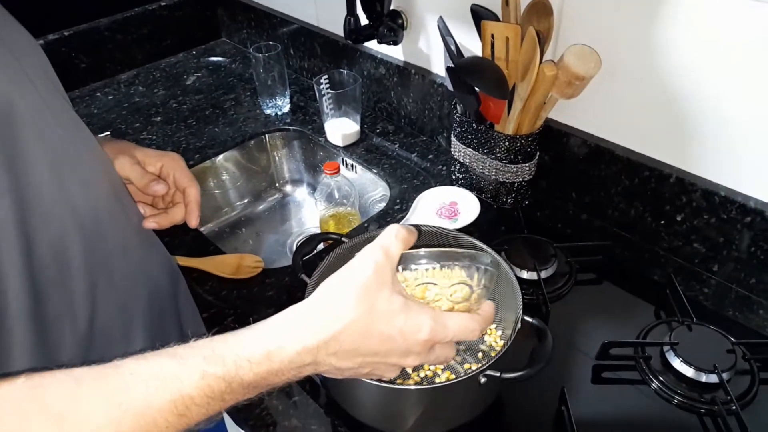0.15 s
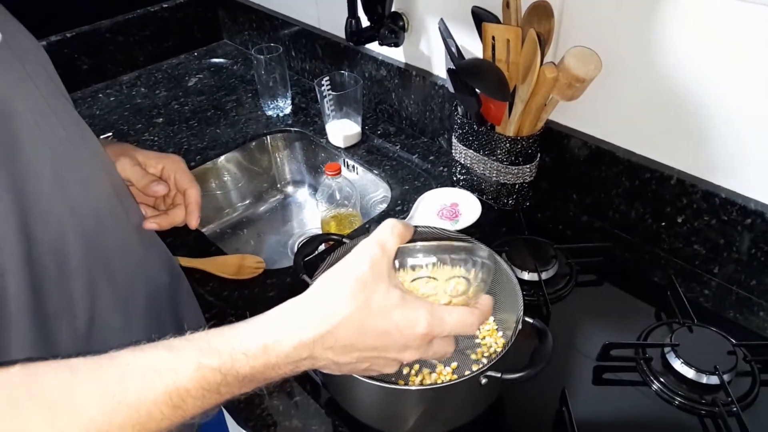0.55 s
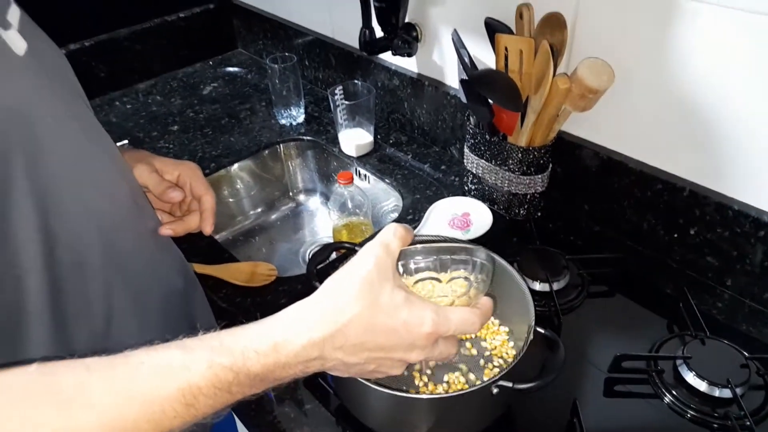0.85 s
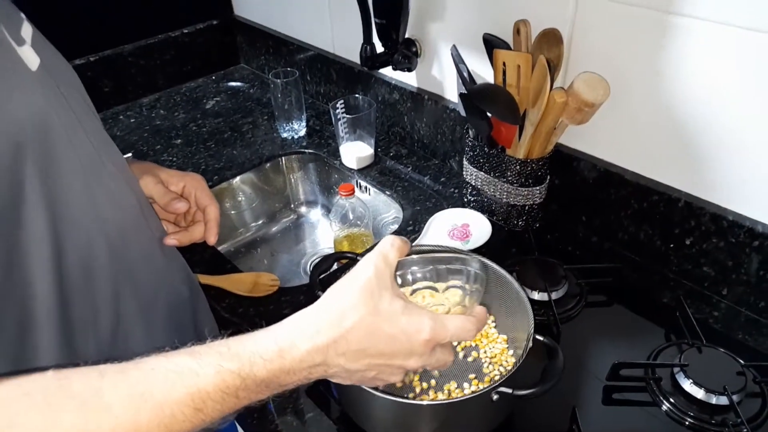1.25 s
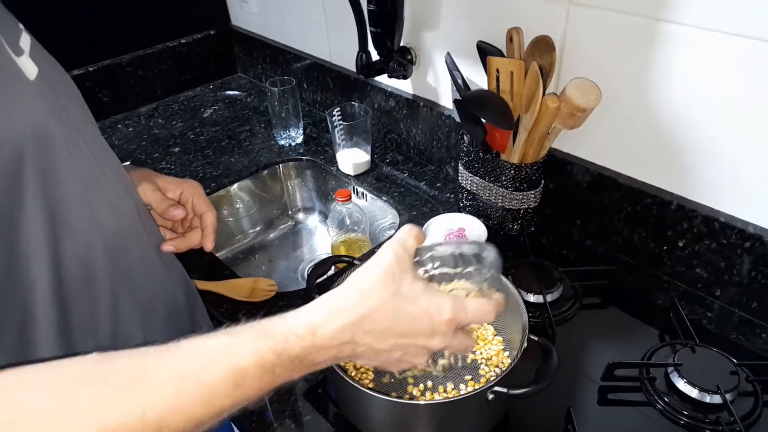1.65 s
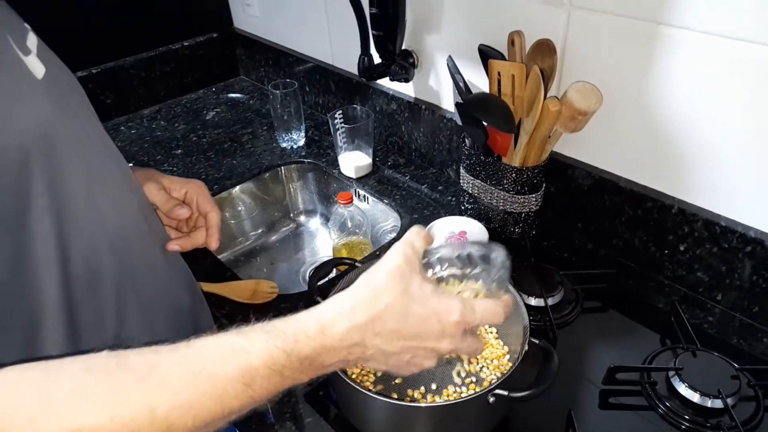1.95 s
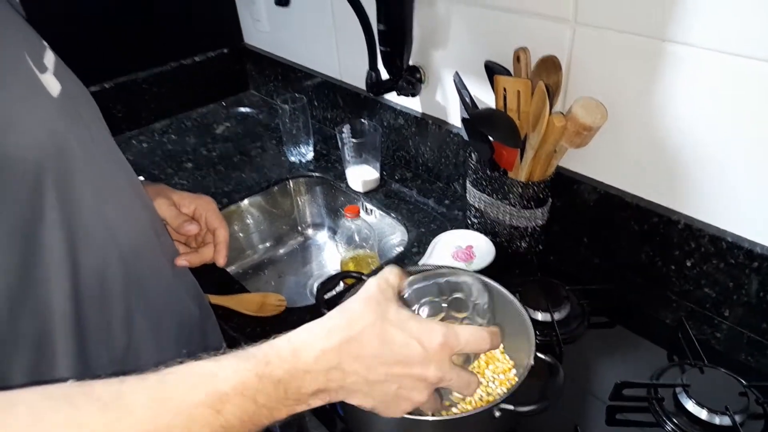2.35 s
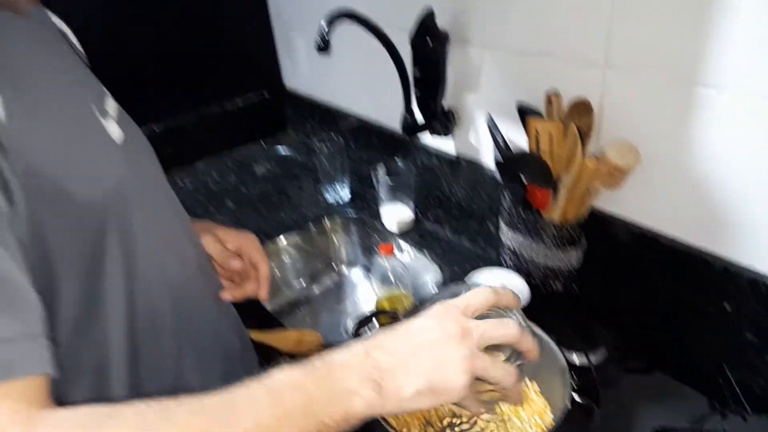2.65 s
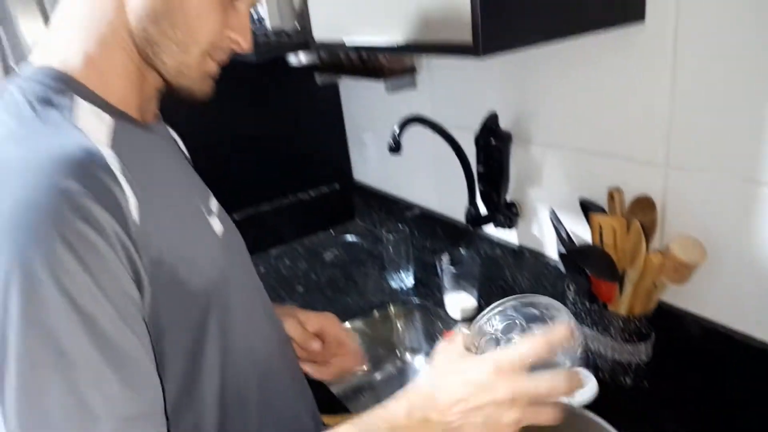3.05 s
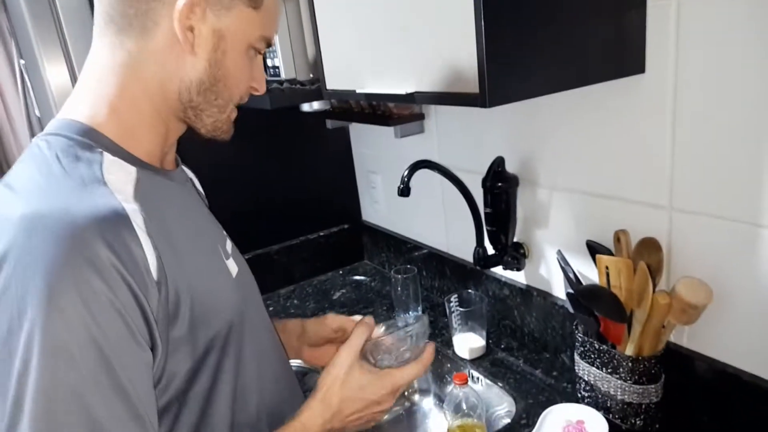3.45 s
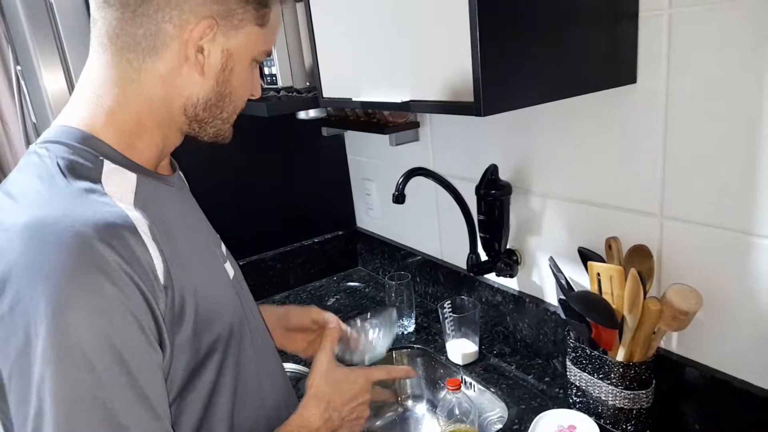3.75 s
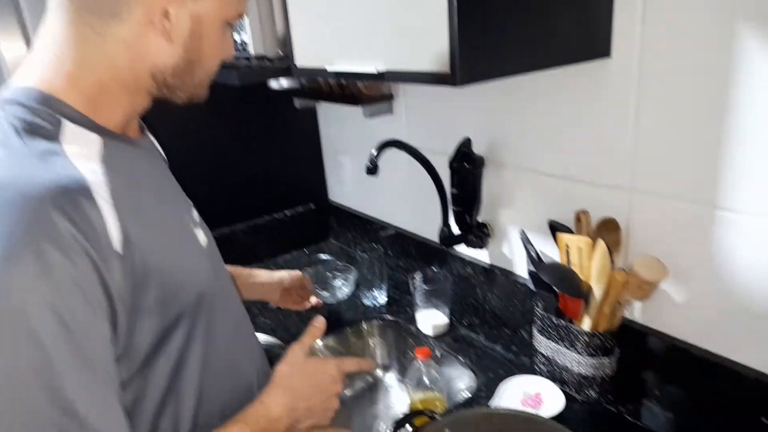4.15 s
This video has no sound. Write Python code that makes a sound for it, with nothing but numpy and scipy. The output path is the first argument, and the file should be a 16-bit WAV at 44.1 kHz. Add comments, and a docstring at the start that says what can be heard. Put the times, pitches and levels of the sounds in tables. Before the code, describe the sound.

Close to the microphone in a tiled kitchen, hard corn kernels clatter into a metal pot on the stove, coming in clumps over a thin trickle. Sharp ticks and pings mix with the ring of the pot and a low rumble, and the growing heap rattles more dully. After the last kernels settle, only a faint hiss and a few light knocks and clinks of hands on the glass bowl remain.

```python
"""A tiled kitchen, a phone's stereo microphone close to a metal pot on the stove.
Dry popcorn kernels are shaken in from a glass bowl, in spurts and clumps over a thin trickle.
They tick on the metal, ring the pot and thump the stove; the growing heap adds a duller rattle.
When the last ones settle, hands knock lightly on the empty bowl over a soft background hiss."""
import sys
import numpy as np
from scipy import signal
from scipy.fft import rfft, irfft
from scipy.io import wavfile
from scipy.ndimage import uniform_filter1d

SR = 44100
rng = np.random.default_rng(int(sys.argv[2]) if len(sys.argv) > 2 else 0)


def transcribe(signal):
    """Save signal, clipped to [-1, 1], as a 16-bit WAV file at the path in sys.argv[1]."""
    frames = np.atleast_2d(signal).T
    limited = np.clip(frames, -1, 1)
    pcm = np.round(limited * 32767).astype(np.int16)
    wavfile.write(sys.argv[1], SR, pcm)


N = 190280
TIME = np.arange(N) / SR


def undb(db):
    """Decibels to gain."""
    return 10 ** (np.asarray(db) / 20)


def unit(x):
    """Scale to unit energy in each channel."""
    return x / np.sqrt(np.sum(x ** 2, axis=-1, keepdims=True))


def curves(table):
    """Each column of a table, joined by straight lines in time."""
    times, *columns = np.transpose(table)
    return [np.interp(TIME, times, column) for column in columns]


def at_hz(points, hz):
    """Read (Hz, value) points on a log-frequency axis."""
    freqs, values = np.transpose(points)
    return np.interp(np.log(hz + 1), np.log(freqs), values)


def convolve(x, response):
    """Convolve, keeping the length."""
    return signal.oaconvolve(np.atleast_2d(x), np.atleast_2d(response), axes=-1)[:, :x.shape[-1]]


def tint(x, spectrum, size=4096):
    """Minimum-phase filter with the given spectrum and unit power gain."""
    gain = undb(at_hz(spectrum, np.fft.rfftfreq(size, 1 / SR)))
    cepstrum = irfft(np.log(gain))
    cepstrum[1:size // 2] *= 2
    cepstrum[size // 2 + 1:] = 0
    response = irfft(np.exp(rfft(cepstrum)))
    return convolve(x, unit(response))


def mode(x, hz, t60, drift=0, lead=0):
    """One ringing mode with unit power gain; its phase may drift, and lead by a set angle."""
    pole = np.exp((2j * np.pi * hz - np.log(1000) / t60) / SR)
    gain = np.sqrt(2 * (1 - abs(pole) ** 2))
    turn = np.exp(1j * drift)
    ring = signal.lfilter([gain], [1, -pole], x / turn) * turn
    return (ring * np.exp(1j * lead)).imag


def pan(x, db):
    """Lean to the microphone's left by db."""
    return x * undb(np.array([[db], [-db]]) / 2)


def walk(rate):
    """Smooth random motion with a spread near 1 and `rate` turns a second."""
    hold = int(SR / rate)
    steps = np.repeat(rng.standard_normal(N // hold + 1), hold)
    return 1.31 * uniform_filter1d(uniform_filter1d(steps, hold), hold)[:N]


def stream(rate, scatter_db):
    """Random impacts of uneven size, `rate` a second, with a fairly steady power."""
    sizes = undb(scatter_db * np.clip(rng.standard_normal(N), -3, 1.8))
    hits = sizes * (rng.random(N) < rate / SR)
    power = uniform_filter1d(hits ** 2, int(0.024 * SR))
    return hits / np.sqrt(np.abs(power) + 0.15 * power.mean())


def cracks(hits, t60, rise_s=0.00048):
    """Every impact sets off its own brief crack of noise, different in each channel."""
    fall, rise = np.exp(-np.log(1e6) / t60 / SR), np.exp(-1 / rise_s / SR)
    power = signal.lfilter([(1 - fall) * (1 - rise)], np.poly([fall, rise]), hits ** 2 + 1e-18)
    return np.sqrt(np.abs(power)) * rng.standard_normal((2, N))


# reverberation of the tiled room: (frequency [Hz], t60 [s])
KITCHEN_T60 = [(100, 1), (600, 0.42), (3000, 0.67), (7000, 0.24), (14000, 0.17)]
def kitchen(x, early_db, tail_db, early_t60=0.17, shared_hz=450, size=32768):
    """Direct sound, quick echoes off pot wall, counter and tiles, then a tail whose treble dies first."""
    hz, age, noise = signal.stft(rng.standard_normal((3, size)), SR, nperseg=256)
    shared = 1 / (1 + (hz[:, None] / shared_hz) ** 4)  # both channels get the same bass
    field = np.sqrt(shared) * noise[:1] + np.sqrt(1 - shared) * noise[1:]
    early = signal.istft(field * undb(-60 * age / early_t60))[1]
    decay = undb(-60 * age / at_hz(KITCHEN_T60, hz)[:, None])
    onset = 1 - np.exp(-age / 0.00049)
    tail = signal.istft(field * decay * onset)[1]
    return x + convolve(x, undb(early_db) * unit(early) + undb(tail_db) * unit(tail))


# kernels that keep sliding out between the shakes: (time [s], level [dB])
TRICKLE = [(0, -17.5), (.8, -25), (1.1, -18.5), (1.22, -30.5), (1.38, -24), (1.5, -24), (1.57, -29),
           (1.62, -28.5), (1.68, -26), (1.8, -24), (2.2, -23), (2.78, -24.5)]
def trickle(settle_db_per_s, pour_end_s=2.782):
    """Gain of the thin stream under the spurts, which dies when the bowl is empty."""
    return undb(curves(TRICKLE)[0] - settle_db_per_s * np.maximum(TIME - pour_end_s, 0))


def spurt(start, length, swell_db, attack_s=0.0036, release_db_per_s=210):
    """Gain of one spurt: a quick attack, a hold that swells or sags, then a steady release."""
    age = np.maximum(TIME - start, 0)
    hold_db = swell_db * (np.minimum(age / length, 1) - .5)
    release_db = release_db_per_s * np.maximum(age - length, 0)
    return (1 - np.exp(-age / attack_s)) * undb(hold_db - release_db)


def clumps(rows, spread_s=0.008, taper_db=28, count=8):
    """A clump is a handful of kernels landing within milliseconds, hardest near its middle."""
    hits = np.zeros(N)
    for (start, db), chance in zip(rows, rng.random((len(rows), count))):
        lateness = (np.arange(count) + chance - chance[0]) / count
        landings = ((start + spread_s * lateness) * SR).astype(int)
        hits[landings] += undb(db) * unit(undb(-taper_db * np.abs(lateness - .35)))
    return hits


# one spurt for each shake of the bowl: (time [s], length [s], level [dB], swell over its length [dB],
# leading clump [dB], heap rattle relative to the spurt [dB], stove thump [dB])
SPURTS = [(0.017, 0.077, -20.5, 1.5, -27.5, -15, -39), (0.183, 0.075, -20.5, 2, -17, -13, -37),
          (0.271, 0.045, -19.5, -11, -15.5, -13.5, -39.5), (0.452, 0.08, -22, 0, -17, -13.5, -40.5),
          (0.515, 0.043, -19.5, 4, -15.5, -11.5, -38), (0.637, 0.14, -20, -4, -20.5, -14.5, -41),
          (0.743, 0.068, -20, -5, -20, -14.5, -44), (0.868, 0.12, -19.5, 2.5, -18, -11, -38.5),
          (1.007, 0.099, -19.5, -5.5, -24, -14.5, -47), (1.16, 0.012, -23, 2, -19, -10.5, -41),
          (1.221, 0.16, -21, -2, -15, -17.5, -44), (1.454, 0.059, -19, 3, -15.5, -14.5, -40),
          (1.63, 0.085, -19, 6.5, -15.5, -14.5, -40), (1.826, 0.1, -22.5, 4, -21, -15.5, -45),
          (1.983, 0.17, -19.5, 3, -27, -15.5, -40.5), (2.247, 0.11, -18.5, -2, -29, -11.5, -45),
          (2.418, 0.12, -17.5, -5.5, -17.5, -9, -44.5), (2.544, 0.19, -18, -2, -19.5, -8.5, -47)]
# clumps that drop during a spurt or after it: (time [s], level [dB])
CLUMPS = [(0.031, -18.5), (0.05, -25), (0.084, -18.5), (0.1, -19), (0.193, -17.5), (0.209, -19.5),
          (0.238, -24), (0.299, -22.5), (0.327, -18), (0.362, -16.5), (0.416, -22), (0.467, -19.5),
          (0.544, -22), (0.614, -20), (0.66, -24), (0.682, -15), (0.791, -23.5), (0.833, -22.5),
          (0.881, -18), (0.908, -23), (0.932, -21), (0.943, -22), (0.956, -20), (1.018, -26), (1.037, -28),
          (1.05, -17), (1.07, -19.5), (1.085, -19), (1.11, -17), (1.166, -21.5), (1.179, -17.5),
          (1.254, -25), (1.277, -16.5), (1.326, -18.5), (1.361, -17.5), (1.395, -21), (1.426, -22),
          (1.474, -18.5), (1.498, -21), (1.514, -16.5), (1.61, -23), (1.66, -22), (1.686, -26),
          (1.705, -28), (1.814, -24), (1.846, -23), (1.871, -23), (1.886, -26), (1.906, -18.5),
          (1.972, -25), (1.988, -24.5), (2.004, -29), (2.033, -20), (2.055, -17.5), (2.074, -16.5),
          (2.107, -19), (2.149, -21), (2.182, -20), (2.231, -21), (2.264, -17), (2.333, -21),
          (2.468, -18.5), (2.573, -26), (2.631, -21)]
def kernels():
    """The pour, close up: stream and clumps tick on the metal, ring the pot and rattle on the heap."""
    starts, lengths, _, _, leading_db, on_heap_db, _ = np.transpose(SPURTS)
    thrown = [undb(db) * spurt(start, length, swell_db) for start, length, db, swell_db, *_ in SPURTS]
    flow = np.max(thrown + [trickle(settle_db_per_s=125)], axis=0)
    hits = undb(-4.5) * stream(rate=680, scatter_db=3.5) * flow
    hits += undb(21.5) * clumps(list(zip(starts, leading_db)) + CLUMPS)
    heap_db = np.interp(TIME, starts + lengths / 2, on_heap_db)
    bare = undb(-.7 * (heap_db - heap_db.min()))  # cushioned by the heap, kernels ring the pot less
    rings = pot(hits * bare)
    rattle = heap(hits * undb(heap_db))
    return ticks(hits) + undb(-28.5) * pan(rings, db=2) + undb(-8.5) * pan(rattle, db=3)


# spectra of a kernel's tick, its ping and the snap of a hard landing: (frequency [Hz], level [dB])
TICK_SPECTRUM = [(200, -44), (500, -32), (1450, -19), (2300, -13.5), (3600, -13), (4700, -8.5),
                 (5900, -9.5), (7000, -3.5), (9000, -9), (12000, -1), (16000, -7)]
PING_SPECTRUM = [(5500, -34.5), (6350, -13.5), (6750, -4.5), (7180, -2.5), (7650, -22), (8800, -20.5)]
SNAP_SPECTRUM = [(7500, -25), (9500, -10), (11000, -6), (12500, 2.5), (16000, 3.5)]
def ticks(hits, spots=4):
    """Hard shells on steel: a dry tick, a ping and, for hard landings, a bright snap."""
    power = np.abs(uniform_filter1d(hits ** 2, int(0.063 * SR)))
    hardness = (power / power.mean()) ** .25  # harder contacts are shorter, so the top octave grows most
    landing_spot = rng.integers(spots, size=N)
    out = 0
    for spot in range(spots):  # each spot in the pot reaches the microphone by its own paths
        here = hits * (landing_spot == spot)
        tick = tint(cracks(here, t60=0.004, rise_s=0.0005), TICK_SPECTRUM)
        ping = tint(cracks(here, t60=0.0099), PING_SPECTRUM)
        snap = tint(cracks(here * hardness, t60=0.0049, rise_s=0.00034), SNAP_SPECTRUM)
        direct = undb(-5.7) * pan(tick, db=-2.2) + undb(-14) * ping + undb(-5) * pan(snap, db=-2)
        out += kitchen(direct, early_db=-0.5, tail_db=-2, early_t60=0.12)
    return out


def wander(hz, pitch_share=0.00605):
    """Phase [rad] that a mode gains as sliding kernels detune it."""
    return 2 * np.pi * np.cumsum(hz * pitch_share * walk(rate=6.98)) / SR


# modes of the pot: (frequency [Hz], level [dB], t60 [s], gain once kernels cover the base [dB],
# phase lead of the left channel [rad])
POT_MODES = [(346.5, 0, 0.4, 2.5, 0.5), (377, 3, 0.065, -19, 0), (435, 5, 0.23, -11, -0.8),
             (503.7, 1.5, 0.08, -1.5, 0.5), (569, -3.5, 0.051, 4, -1.7), (603, -1.5, 0.13, -1.5, 2.4),
             (642, 1, 0.052, 0, -2.2), (697, 1, 0.15, 5, 3.3), (843, 0, 0.075, 0, -0.8),
             (913, 2, 0.12, -1.5, -1.2), (1003, -4.5, 0.057, -3, -0.8), (1150, 0.5, 0.12, 2, -1.1),
             (1215, 5.5, 0.12, -4.5, 0.37), (1272, 1, 0.22, -1.5, 0.8), (1504, 5.5, 0.063, -12, 2),
             (1775, -6.5, 0.13, 12, 1.5), (1896, 2, 0.081, -14, 1), (2178, 5.5, 0.35, -10, -0.6),
             (2406, 1.5, 0.052, -1, -1.5), (2660, 7, 0.066, -2, 2.5), (2954, 3.5, 0.088, -4, -0.5),
             (3270, 7.5, 0.19, -4, 2.46), (4264, 6.5, 0.083, 3, -3.5), (4480, 7.5, 0.18, -4, 1.5),
             (4694, 12, 0.038, -13, -2), (5000, 7.5, 0.009, -7, -1), (5383, 5, 0.077, -13, 0.5),
             (6650, 4, 0.069, -21, -3), (6804, -4, 0.12, -9, 2), (7190, -4, 0.06, -7, -0.3),
             (7560, -21, 0.097, -10, -1.5)]
def pot(hits):
    """Impacts drive each mode in or out of step, by where they land; the load shifts the balance, and each
    pitch wanders."""
    covered = 1 - np.exp(-(TIME / 1.95) ** 2)
    rings = 0
    for hz, db, t60, covered_db, lead in POT_MODES:
        drive = hits * rng.choice([-1, 1], N) * undb(db + covered_db * covered)
        rings += mode(drive, hz, t60, drift=wander(hz), lead=np.array([[lead], [0]]))
    return kitchen(rings, early_db=-7, tail_db=-13.5, early_t60=0.062, shared_hz=470)


# spectrum of the heap in the pot: (frequency [Hz], level [dB])
HEAP_SPECTRUM = [(150, -18), (240, -30), (300, -9.5), (410, -15), (520, -1.5), (590, 1), (680, 0),
                 (790, -2), (900, -4.5), (1170, 2), (1420, -9.5), (1690, -13), (1778, -6.5), (1870, -8.5),
                 (2200, -11.5), (4000, -18)]
def heap(hits):
    """Kernels landing on other kernels give a short, dull rattle."""
    rattle = tint(cracks(hits, t60=0.0038)[:1], HEAP_SPECTRUM)
    return kitchen(rattle, early_db=1.5, tail_db=0.5, early_t60=0.022, shared_hz=670)


# spectrum of the stove top: (frequency [Hz], level [dB])
STOVE_SPECTRUM = [(15, -34), (35, -22), (60, -5), (100, -7), (125, -7.5), (170, -31), (300, -22.5),
                  (800, -31.5)]
def stove():
    """Blows pass through the pot; the stove top, a little to the right, rumbles most as a spurt begins."""
    thumps = [undb(db) * spurt(start, length, swell_db=-3) for start, length, *_, db in SPURTS]
    force = np.max(thumps + [undb(-24.5) * trickle(settle_db_per_s=45)], axis=0)
    blows = stream(rate=320, scatter_db=5.5) * rng.choice([-1, 1], N) * force
    rumble = tint(blows + 1.05 * cracks(blows, t60=0.12), STOVE_SPECTRUM)
    return undb(-5.5) * pan(rumble, db=-4)


# single kernels on bare metal: (time [s], level [dB], pitch that the spot favours [Hz])
STRIKES = [(0.035, -27, 7560), (0.085, -38, 1215), (0.105, -37, 2178), (0.184, -29, 642), (0.2, -20, 6650),
           (0.265, -38, 2954), (0.272, -39, 5383), (0.274, -29, 6650), (0.29, -42, 2178),
           (0.362, -32, 4694), (0.365, -23, 6804), (0.464, -45, 7560), (0.52, -37, 2178),
           (0.63, -30.5, 2954), (0.634, -30, 913), (0.676, -41, 2406), (0.685, -35.5, 1215),
           (0.742, -30, 603), (0.875, -31, 1003), (0.925, -38, 603), (1.161, -36, 3270), (1.253, -38, 2954),
           (1.277, -36, 4264), (1.454, -28, 2660), (1.477, -32, 7190), (2.048, -40, 3270),
           (2.265, -33, 4480), (2.279, -38, 2954), (2.285, -34, 569), (2.45, -30, 1150), (2.472, -31, 603),
           (2.559, -35, 1215), (2.568, -39, 1775), (2.595, -32, 569), (2.626, -33, 1150)]
def strikes(ring_s=0.3, focus_db_per_octave=127):
    """A lone kernel rings mostly the modes that move at the spot where it lands."""
    hz, _, t60, _, lead = np.transpose(POT_MODES)[:, :, None]
    age = np.arange(int(ring_s * SR)) / SR
    stereo_phase = np.array([lead, 0 * lead])
    rings = undb(-60 * age / t60) * np.sin(2 * np.pi * hz * age + stereo_phase)
    out = np.zeros((2, N))
    for time, db, favoured_hz in STRIKES:
        weight = undb(db - focus_db_per_octave * np.abs(np.log2(hz / favoured_hz)))
        start = int(time * SR)
        out[:, start:start + len(age)] += np.sum(weight * rings, axis=1)
    return kitchen(undb(-0.5) * out, early_db=-16, tail_db=-18, early_t60=0.058)


def low_note(hz, flutter_db=1.8):
    """One low note of the pot, broken up by landing kernels."""
    return undb(flutter_db * walk(rate=50)) * np.sin(2 * np.pi * hz * TIME + wander(hz))


# heavy landings that swell two low notes of the pot: (time [s], lower note [dB], upper note [dB])
SWELLS = [(0.16, -60, -35.5), (0.26, -49, -40), (0.33, -44, -49), (0.65, -40.5, -45), (0.73, -39, -67),
          (0.91, -46, -41.5), (1.1, -40.5, -58), (1.44, -63, -43.5), (1.51, -42.5, -54), (1.69, -41.5, -52),
          (1.8, -57, -44), (1.84, -40.5, -60), (2.09, -48, -47), (2.28, -43, -69), (2.43, -45.5, -68)]
def pot_swells(rise_s=0.049):
    """After a heavy landing two low notes build up, then the kernels damp them."""
    lower, upper = np.zeros((2, N))
    for start, lower_db, upper_db in SWELLS:
        age = np.maximum(TIME - start, 0) / rise_s
        swell = (age * np.exp(1 - age)) ** 2
        lower = np.maximum(lower, undb(lower_db) * swell)
        upper = np.maximum(upper, undb(upper_db) * swell)
    return undb(-1) * (pan(lower * low_note(hz=348), db=0.5) + pan(upper * low_note(hz=436), db=5.5))


# spectrum of the room's air: (frequency [Hz], level [dB])
AIR_SPECTRUM = [(15, -51), (25, -22), (64, -3.5), (117, -4), (141, -12), (451, -4.5), (1020, -12),
                (1260, -4), (1650, -22), (1790, -9.5), (4250, -18), (7110, -15), (8360, -28.5),
                (14800, -13.5), (16000, -21)]
# hollow resonances in it: (frequency [Hz], width [Hz], level [dB])
AIR_PEAKS = [(302.7, 1.7, -9), (1235, 50, -20), (1805, 70, -10), (2420, 32, -17)]
# after the pour: (time [s], hiss as the recorder's gain recovers [dB], hand and sleeve rustle [dB])
QUIET_LEVELS = [(3.1, -66, -61), (3.3, -66, -63), (3.55, -65.5, -68.5), (3.72, -65, -60.5),
                (3.82, -63, -59), (4.0, -64, -58), (4.31, -58.5, -55)]
def background_hiss():
    """Soft hiss with a few hollow resonances, louder as the recorder's gain recovers after the pour."""
    sides = rng.standard_normal((2, N))
    centre = rng.standard_normal(N)
    air = tint(0.97 * sides + 0.58 * centre, AIR_SPECTRUM)
    drive = 0.5 * sides + 0.52 * centre
    hollow = sum(undb(db) * mode(drive, hz, t60=np.log(1000) / np.pi / width)
                 for hz, width, db in AIR_PEAKS)
    return (undb(6) * air + undb(7) * hollow) * undb(curves(QUIET_LEVELS)[0])


# fingers on the bowl: (time [s], level [dB], then relative to it: knock [dB], clink [dB], brush [dB])
TOUCHES = [(3.145, -53, -17, -16, 4), (3.183, -43.5, 11, -13, -6), (3.329, -50, -5, -4, 0),
           (3.44, -47.5, -18, -18, 5), (3.487, -39, -3, 3, -12), (3.551, -41.5, 4, -9, -13),
           (3.62, -46.5, 9, -12, -3), (3.781, -47.5, -12, -23, 3.5), (3.801, -42, 8.5, -7, -1.5),
           (4.079, -37, 5.5, -6, -2), (4.208, -43, 11, -14, -10), (4.235, -42.5, 1, -12, 4),
           (4.289, -32, 6.5, -11, -3.5), (4.297, -43, 8, -14, -8)]
# modes of the hand-damped glass: (frequency [Hz], level [dB], t60 [s])
BOWL_MODES = [(1270, -1, 0.095), (1390, -7, 0.05), (1780, -23, 0.15), (2400, -23, 0.09), (2875, -20, 0.1),
              (3070, -17, 0.16), (3670, -14, 0.045), (3950, -15, 0.03), (4550, -20, 0.1)]
# spectra of a dull knock and a bright rub on the bowl: (frequency [Hz], level [dB])
KNOCK_SPECTRUM = [(60, -34), (400, 4), (800, -10), (1200, -1), (1600, 0), (2500, -4), (4500, -7),
                  (8000, -56)]
RUB_SPECTRUM = [(500, 6), (3000, 6), (7000, 3), (9000, 1), (12500, 9), (16000, 5.5)]
def bowl(contact_s=0.0002):
    """Fingers knock on the glass, make it clink and brush over it; hands and sleeve rustle faintly."""
    knocks, clinks, brushes = blows = np.zeros((3, N))
    for time, db, *parts_db in TOUCHES:
        blows[:, int(time * SR)] = undb(db + np.array(parts_db))
    width = int(contact_s * SR)
    push = uniform_filter1d(uniform_filter1d(knocks, width), width)  # a soft fingertip rounds the blow
    knock = tint(undb(2.5) * push + cracks(knocks, t60=0.082), KNOCK_SPECTRUM)
    clink = undb(12) * sum(undb(db) * mode(clinks, hz, t60) for hz, db, t60 in BOWL_MODES)
    brush = undb(17) * tint(cracks(brushes, t60=0.1), RUB_SPECTRUM)
    slips = stream(rate=400, scatter_db=7)
    rustle = tint(cracks(slips, t60=0.0068), RUB_SPECTRUM) * undb(curves(QUIET_LEVELS)[1] + 1)
    handling = kitchen(knock + brush + rustle, early_db=-7, tail_db=-8, early_t60=0.06)
    return handling + kitchen(clink, early_db=-14, tail_db=-12)


def scene():
    """From beside the stove: the pour with its rumble, pings and low notes, then the bowl over hiss."""
    return kernels() + stove() + strikes() + pot_swells() + background_hiss() + bowl()


def record(dry, top_hz=15750):
    """The phone's microphone cuts the top steeply."""
    return signal.sosfilt(signal.ellip(12, .2, 80, top_hz, fs=SR, output="sos"), dry)


dry = scene()
out = record(dry)
transcribe(out)
```